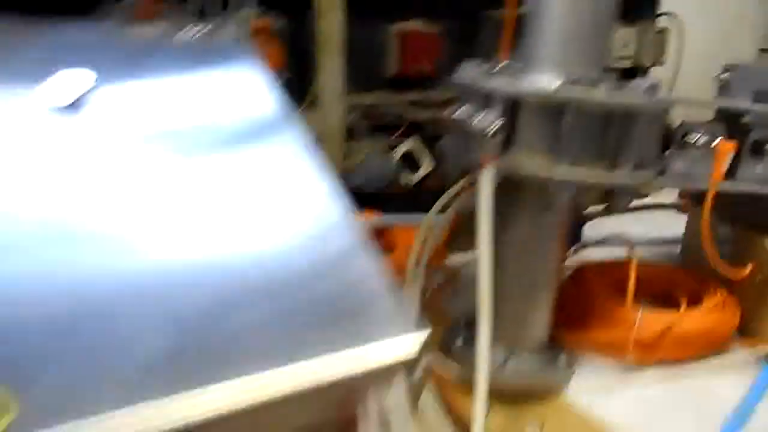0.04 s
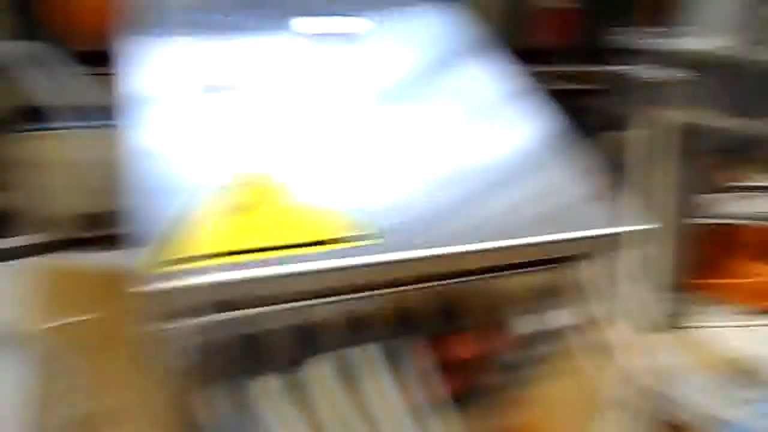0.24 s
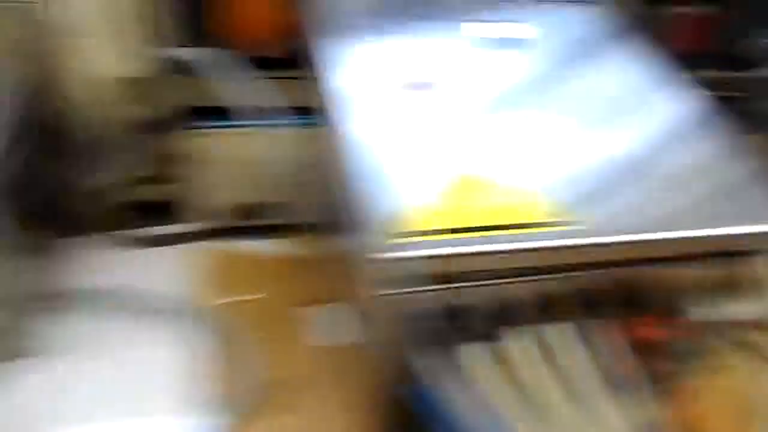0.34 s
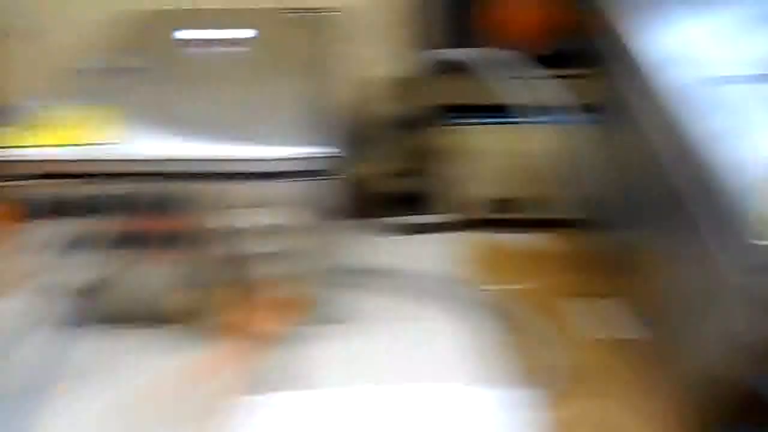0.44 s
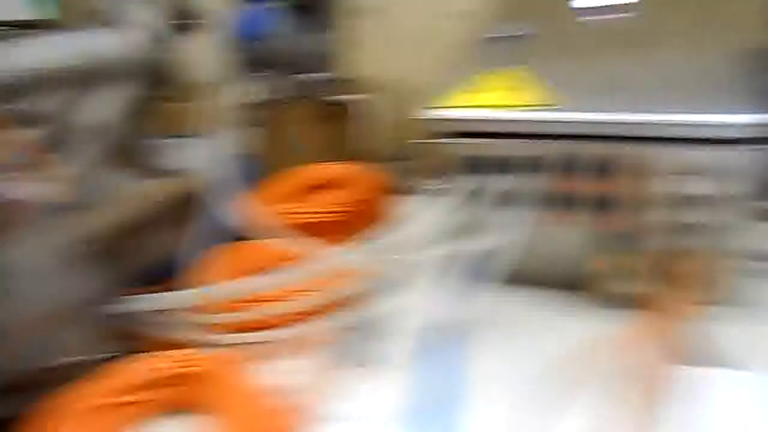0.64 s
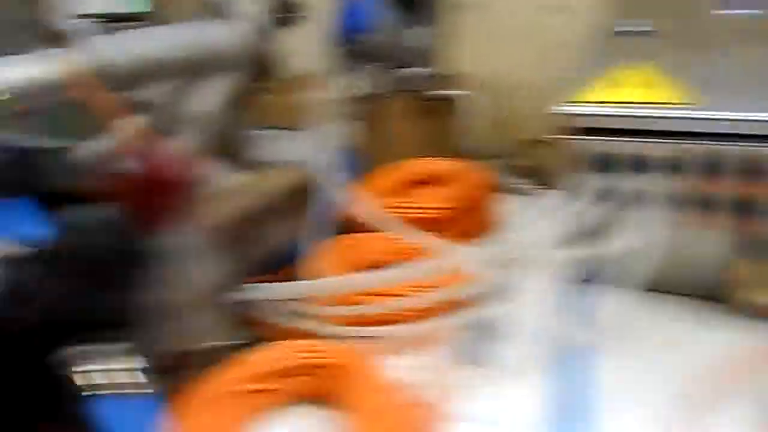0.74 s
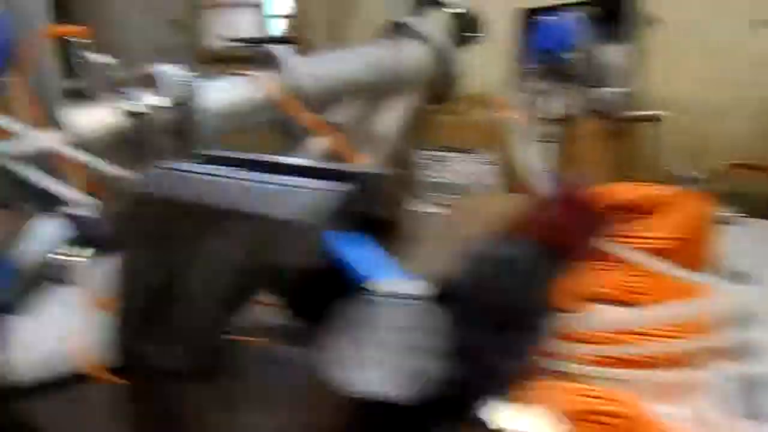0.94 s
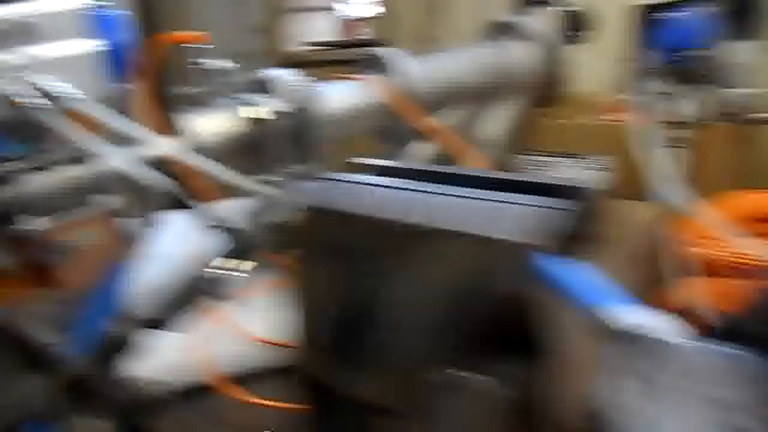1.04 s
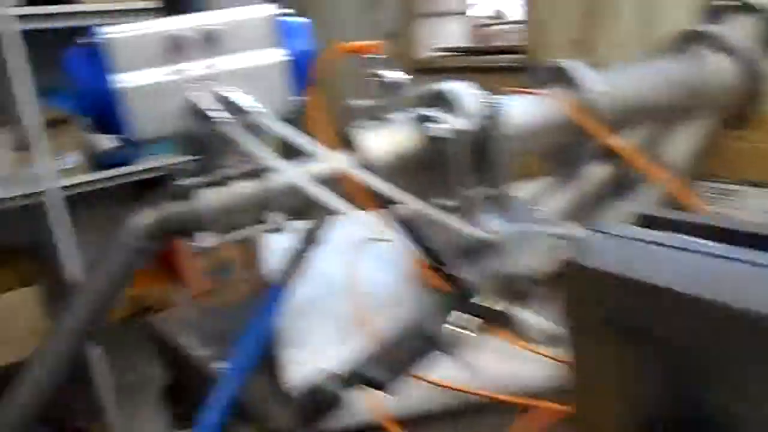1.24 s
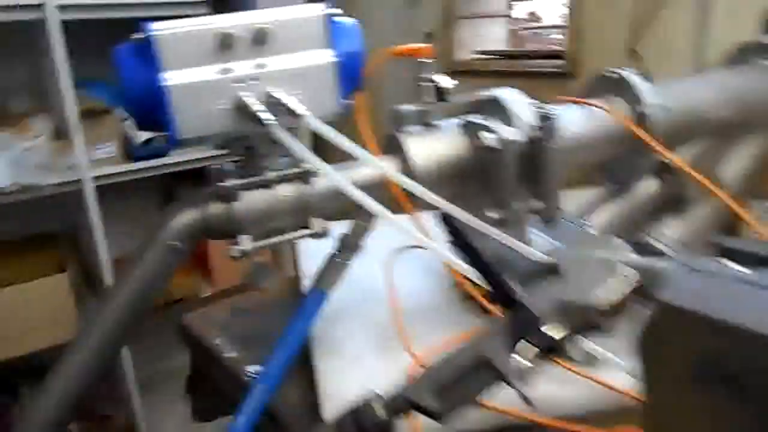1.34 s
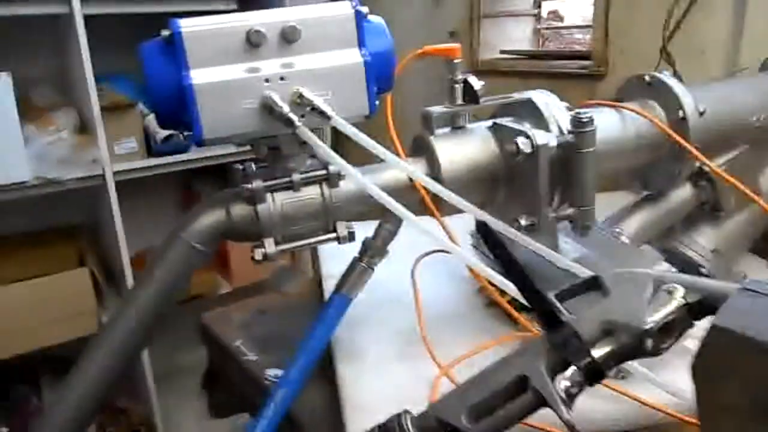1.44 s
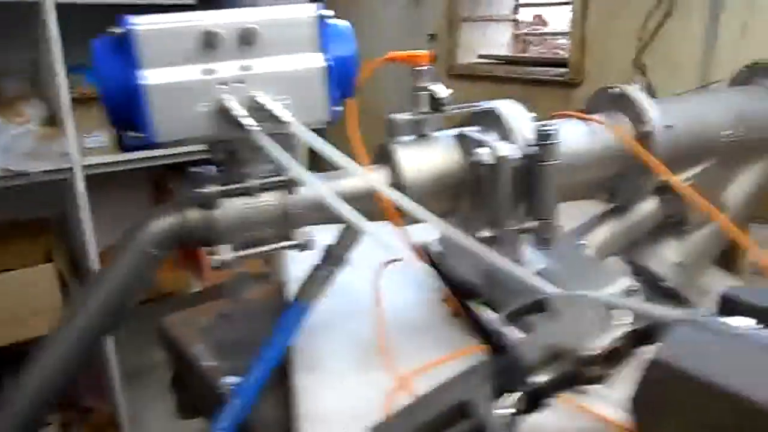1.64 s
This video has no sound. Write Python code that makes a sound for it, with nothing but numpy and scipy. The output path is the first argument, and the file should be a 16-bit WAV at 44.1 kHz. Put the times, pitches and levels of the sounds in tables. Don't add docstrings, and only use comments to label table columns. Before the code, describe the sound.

Faint shop noise and distant hiss open. At 0.2 s a valve ticks and a loud, sharp air burst explodes, sagging into sputtering exhaust with a swelling hollow hose tone until 0.5 s. A short dull scrape rubs at 0.63 s. At 1.1 s a softer blast snaps with a quick falling whistle, hissing until 1.4 s, then metallic ticks and short room echo. Phone sound, dulled on top.

```python
import sys
import numpy as np
from scipy import signal
from scipy.fft import rfft, irfft
from scipy.io import wavfile
from scipy.ndimage import uniform_filter1d

SR = 44100
rng = np.random.default_rng(int(sys.argv[2]) if len(sys.argv) > 2 else 0)


def inscribe(sig):
    pcm = np.round(np.clip(np.atleast_2d(sig).T, -1, 1) * 32767)
    wavfile.write(sys.argv[1], SR, pcm.astype(np.int16))


def makeup_ratio(level_db):
    decades = np.asarray(level_db, float) / 20
    return 10 ** decades


N = 74970

# opens t/s, level/dB, hold/s, sag/(dB/s), rise/s
BURSTS = [
    (.2315, -9, 0.015, 138, 0.0066),
    (1.116, -14.5, 0.037, 219, 0.0032),
]
# piston starts t/s, stops t/s, level/dB, swell over the stroke/dB, closing fall/(dB/s)
STROKES = [
    (0.22, 0.519, -30.5, 2, 307),
    (1.11, 1.414, -26, 0, 189),
]
# f/Hz, level per Hz/dB
FIRST_EXHAUST = [(35, -61), (60, -50), (198, 1), (485, -4), (1270, -4), (2110, -3.5), (5630, -3.5),
                 (8090, -12), (9800, -24.5), (12700, -67.5), (21600, -120)]
FILL_S = 0.1


def unit(x):
    return x / np.sqrt(np.mean(x ** 2))


def colour(x, outline, peaks=()):
    hz = np.maximum(np.arange(N // 2 + 1) * SR / N, 1)
    outline_hz, outline_db = np.array(outline).T
    db = np.interp(np.log(hz), np.log(outline_hz), outline_db)
    for peak_hz, width_hz, lift_db in peaks:
        db = db + lift_db / (1 + (2 * (hz - peak_hz) / width_hz) ** 2)
    return unit(irfft(rfft(x) * makeup_ratio(db), N))


def walk(rate_hz):
    hold = int(SR / rate_hz)
    steps = np.repeat(rng.standard_normal(N + 1)[:N // hold + 1], hold)
    slewed = uniform_filter1d(uniform_filter1d(steps, hold), hold)
    return unit(slewed[:N])


def jet(outline, peaks=()):
    flutter_db, flutter_hz = 1.0, 60
    spectrum = rfft(colour(rng.standard_normal(N), outline, peaks))
    octave = np.log2(np.maximum(np.arange(N // 2 + 1) * SR / N, 1))
    air = 0
    for half_octave in range(10, 30):
        share = np.cos(np.pi / 2 * np.clip(2 * octave - half_octave, -1, 1)) ** 2
        air = air + irfft(spectrum * share, N) * makeup_ratio(flutter_db * walk(flutter_hz))
    return air


def ridge(hz, width_hz, lift_db):
    return colour(rng.standard_normal(N), [(20, 0.014), (20000, 0.0059)], [(hz, width_hz, lift_db)])


def highpass(x, order, hz):
    return signal.sosfilt(signal.butter(order, hz, "high", fs=SR, output="sos"), x)


def lowpass(x, order, hz):
    return signal.sosfilt(signal.butter(order, hz, fs=SR, output="sos"), x)


def shop(t):
    # f/Hz, level per Hz/dB
    shop_outline = [(15, -27.5), (25, -19.5), (282, -17), (540, -4), (826, -8), (1090, -7), (1170, -6.5),
                    (7630, -20), (9800, -38.5), (12700, -64), (21600, -120)]
    # f/Hz, level per Hz/dB
    far_outline = [(180, -19.5), (300, -10), (1350, -2.5), (1860, -2), (2180, 1), (5230, -4), (8470, -10),
                   (9800, -33.5), (12700, -55), (21600, -120)]
    # t/s, shop level/dB, far hiss level/dB, leak level/dB
    turning = [(0, -49.5, -54, -79), (0.049, -54, -50.5, -84), (0.189, -55.5, -62.5, -88),
               (.6, -46, -52, -79), (.8, -54, -55.5, -64), (1.0, -54.5, -53.5, -61),
               (1.089, -52, -49.5, -60.5), (1.499, -69.5, -40.5, -75.5), (1.7, -54, -56, -53.5)]
    turn_s, *levels_db = np.array(turning).T
    leak = ridge(6700, 1100, 23)
    layers = jet(shop_outline), jet(far_outline), leak
    return sum(layer * makeup_ratio(np.interp(t, turn_s, db)) for layer, db in zip(layers, levels_db))


def handling(t):
    # middle t/s, length/s, f/Hz, level/dB
    brushes = [
        (.79, .035, 62, -71),
        (0.555, 0.06, 200, -62.5),
    ]
    rumble = 0
    for middle, length, hz, db in brushes:
        rumble = rumble + ridge(hz, hz, 50) * makeup_ratio(db) * np.exp(-((t - middle) / length) ** 2)
    return rumble


def scrape(t):
    # f/Hz, level per Hz/dB
    rub_outline = [(59, -122), (100, -37.5), (376, -9), (721, -12.5), (825, -10), (1280, -10.5),
                   (6680, -22), (9800, -44), (12700, -57), (21600, -120)]
    start_s, rise_s, hold_s = .627, .012, 0.066
    level_db, fall_db_s = -41.5, 141
    rate_hz, scatter_db, dull_hz = 700, 1.5, 1800
    slips = rng.random(N) < rate_hz / SR
    strength = makeup_ratio(scatter_db * rng.exponential(size=N)) * rng.standard_normal(N)
    clicks = slips * strength
    wash = rng.standard_normal(N) * np.std(clicks)
    since = t - start_s
    fade = makeup_ratio(level_db - fall_db_s * np.clip(since - hold_s, 0, None))
    return colour(lowpass(clicks, 2, dull_hz) + wash, rub_outline) * np.clip(since / rise_s, 0, 1) * fade


def ticks(t):
    # t/s, ring f/Hz, level/dB, t60/s, rise/s
    impacts = [(.199, 620, -32, .012, .0003), (.2, 4000, -33, .03, .002), (.2075, 4050, -33, .015, .001),
               (.203, 1450, -34, .05, .003), (.2115, 7800, -13, .009, .002), (.2315, 900, -22, .008, .0004),
               (1.1015, 6800, -35, .008, .0003), (1.106, 1300, -24, .008, .0006),
               (1.1165, 2900, -12, .012, .0006), (1.42, 3300, -19, .015, .001),
               (1.457, 1100, -21, .012, .0005), (.445, 3300, -22, .02, .002),
               (.6635, 900, -27, .012, .0005)]
    rings = 0
    for on, hz, db, t60, rise in impacts:
        since = np.clip(t - on, 0, None)
        envelope = makeup_ratio(db - 60 * since / t60) * (1 - np.exp(-(since / rise) ** 2))
        rings = rings - envelope * np.sin(2 * np.pi * hz * since)
    return rings


def pilot_air(t):
    # f/Hz, width/Hz, lift/dB
    pilot_port = [(1450, 300, 6), (4000, 500, 6), (7800, 2000, 6)]
    # start t/s, end t/s, level/dB
    wisps = [
        (.199, .219, -44),
        (1.101, 1.106, -46),
        (1.106, 1.118, -39),
    ]
    air = colour(rng.standard_normal(N), FIRST_EXHAUST, pilot_port)
    gain = 0
    for on, off, db in wisps:
        gain = gain + (t > on) * makeup_ratio(db - 2200 * np.clip(t - off, 0, None))
    return air * gain


def whistle(t):
    middle_s, length_s, level_db = 1.158, .016, -27
    middle_hz, fall_hz_s, width_hz = 4600, 65000, 900
    since = t - middle_s
    phase = 2 * np.pi * (middle_hz * since - fall_hz_s * since ** 2 / 2)
    breath = walk(width_hz) * np.sin(phase) + walk(width_hz) * np.cos(phase)
    return breath * makeup_ratio(level_db) * np.exp(-(since / length_s) ** 2)


def howls(t):
    # f/Hz, width/Hz, level at the stop/dB, swell/dB, fall/(dB/s), lag/s
    hoses = [
        (1162, 370, -36.5, 25.5, 326, 0.017),
        (1056, 720, -32.5, 17.5, 183, 0.0071),
    ]
    song = 0
    for (go, stop, *_), (hz, width_hz, db, swell_db, fall, lag) in zip(STROKES, hoses):
        swell = swell_db * np.clip((stop - t) / (stop - go), 0, 1)
        env_db = db - swell - fall * np.clip(t - stop - lag, 0, None)
        song = song + ridge(hz, width_hz, 36) * np.clip((t - go) / FILL_S, 0, 1) * makeup_ratio(env_db)
    return song


def thumps(t):
    # level/dB, f/Hz, decay/s
    pushes = [
        (-49.5, 28, .012),
        (-34.5, 200, 0.007),
    ]
    out = 0
    for (on, *_), (db, hz, decay) in zip(BURSTS, pushes):
        since = np.clip(t - on, 0, None)
        out = out + makeup_ratio(db) * np.sin(2 * np.pi * hz * since) * np.exp(-since / decay)
    return out


def valves(t):
    # f/Hz, level per Hz/dB
    first_burst = [(35, -63), (60, -25.5), (826, -5.5), (2020, -8), (3680, -7.5), (4090, -9), (4950, -1.5),
                   (6400, -3), (9800, -24), (12700, -91), (21600, -120)]
    second_burst = [(35, -71), (60, -39), (626, -8.5), (2610, -16.5), (2850, -15), (4180, -17.5),
                    (6400, -13.5), (9000, -18.5), (9800, -40.5), (12700, -65.5), (21600, -120)]
    # f/Hz, level per Hz/dB
    second_exhaust = [(35, -94), (60, -94), (186, 4.5), (317, -15), (1110, -2), (2200, -10.5), (2790, -7.5),
                      (6260, -9.5), (9800, -26), (12700, -63.5), (21600, -120)]
    # f/Hz, width/Hz, lift/dB
    first_port = [(1220, 300, 2), (1660, 150, 4), (2100, 400, -1), (3200, 300, 4), (3800, 250, 3),
                  (4400, 400, 0), (5000, 400, 3), (5550, 200, 3), (6350, 400, 4), (7050, 400, -5),
                  (7800, 400, 4)]
    second_port = [(1130, 300, 1), (1800, 200, 3), (2300, 400, -3), (2860, 130, 7), (3750, 300, 5),
                   (4500, 500, -3), (5370, 250, 3), (5850, 250, 4), (6400, 300, 4), (7200, 600, -5),
                   (8250, 400, 4)]
    bass_hz, bass_sag_db_s = 470, 260
    exhaust_low_cut_hz = 510
    sputter_db, sputter_hz = .9, 220
    colours = [(first_burst, FIRST_EXHAUST, first_port), (second_burst, second_exhaust, second_port)]
    out = 0
    for burst_event, stroke_event, (burst_outline, exhaust_outline, port) in zip(BURSTS, STROKES, colours):
        on, db, hold, sag, rise = burst_event
        since = np.clip(t - on, 0, None)
        full = jet(burst_outline, port)
        bass_left = makeup_ratio(-bass_sag_db_s * since)
        burst = bass_left * full + (1 - bass_left) * highpass(full, 4, bass_hz)
        out = out + burst * np.clip(since / rise, 0, 1) * makeup_ratio(db - sag * np.clip(since - hold, 0, None))

        go, stop, db, swell_db, close = stroke_event
        swell = swell_db * np.clip((t - go) / (stop - go), 0, 1)
        env_db = db + swell - close * np.clip(t - stop, 0, None)
        exhaust = highpass(jet(exhaust_outline, port), 4, exhaust_low_cut_hz)
        sputter = makeup_ratio(sputter_db * walk(sputter_hz))
        out = out + exhaust * sputter * np.clip((t - go) / FILL_S, 0, 1) * makeup_ratio(env_db)
    return out


def room(x):
    t60_s, treble_t60_s, split_hz, level_db = 0.36, 0.1, 7400, -12
    since = np.arange(SR // 2) / SR
    noise = rng.standard_normal(len(since))
    low = lowpass(noise, 1, split_hz)
    tail = low * makeup_ratio(-60 * since / t60_s) + (noise - low) * makeup_ratio(-60 * since / treble_t60_s)
    tail = tail * np.clip(since / 0.002, 0, 1)
    return makeup_ratio(level_db) * signal.fftconvolve(x, tail / np.sqrt(np.sum(tail ** 2)))[:N]


def scene():
    duck_db, knee_db = -12, -34
    t = np.arange(N) / SR
    near = valves(t) + thumps(t) + howls(t) + whistle(t) + scrape(t) + ticks(t) + pilot_air(t)
    near = near + room(near)
    blast = uniform_filter1d(near ** 2, SR // 20, origin=SR // 40 - 2) / makeup_ratio(knee_db) ** 2
    ducking = makeup_ratio(duck_db * blast / (1 + blast))
    return (near + handling(t) + shop(t) * ducking)[None]


def top_cut(x):
    return signal.sosfilt(signal.butter(12, 10050, fs=SR, output="sos"), x)


def record(dry):
    squeeze, edge_hz, top_hz = 1.4, 9450, 9950
    rounded = np.tanh(squeeze * dry) / squeeze
    mix = lowpass(rounded, 8, edge_hz)
    mix = signal.sosfilt(signal.ellip(10, .5, 75, top_hz, fs=SR, output="sos"), mix)
    return top_cut(mix)


dry = scene()
out = record(dry)
inscribe(out)
```